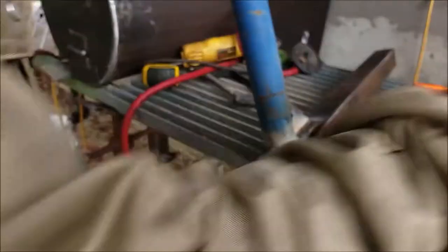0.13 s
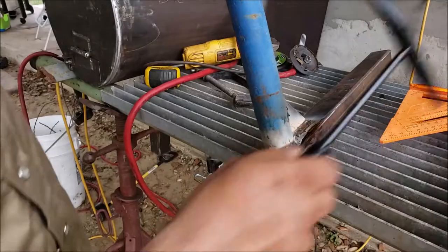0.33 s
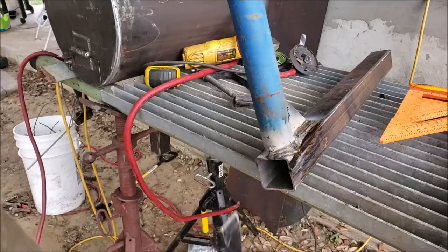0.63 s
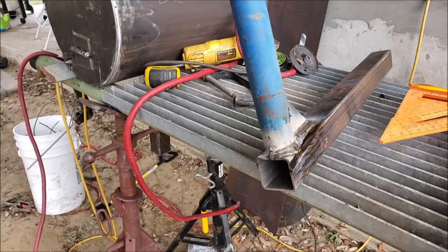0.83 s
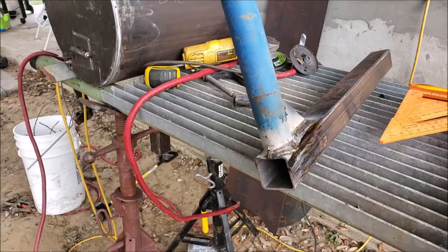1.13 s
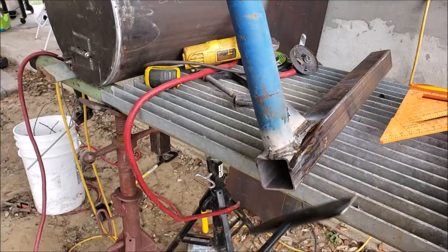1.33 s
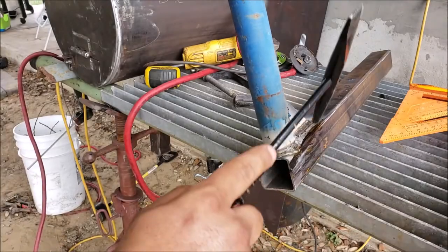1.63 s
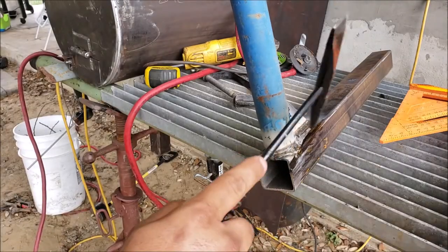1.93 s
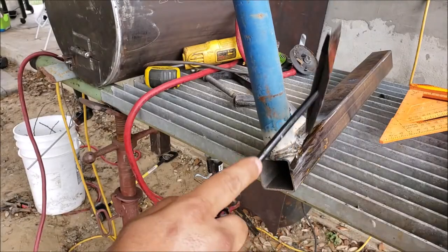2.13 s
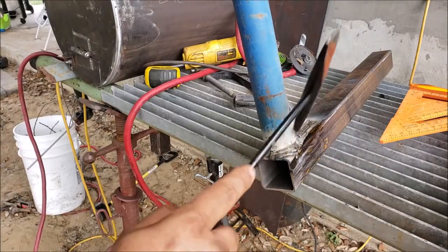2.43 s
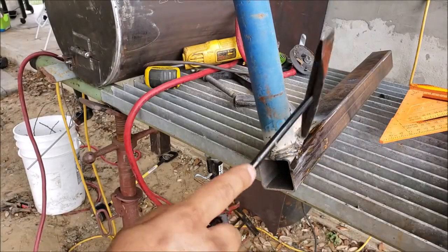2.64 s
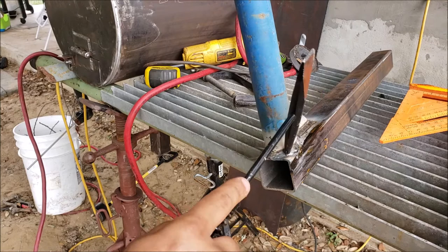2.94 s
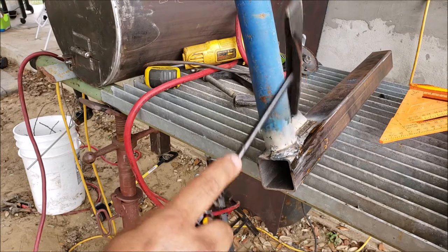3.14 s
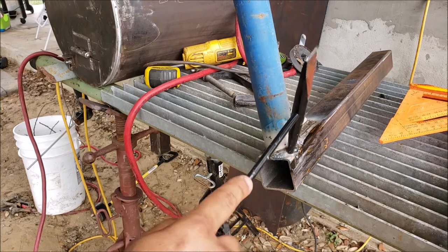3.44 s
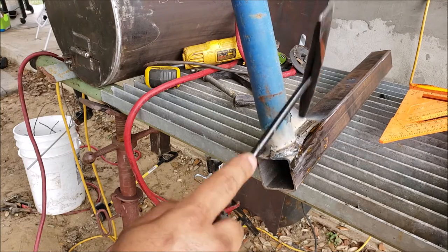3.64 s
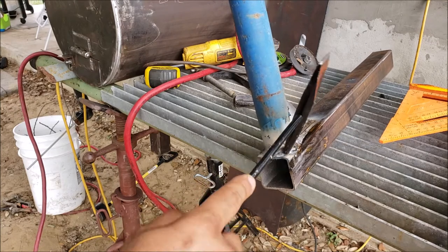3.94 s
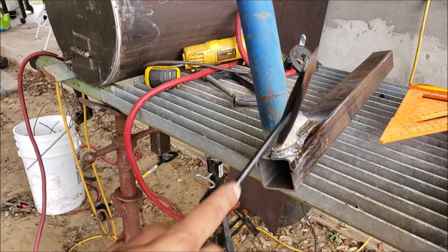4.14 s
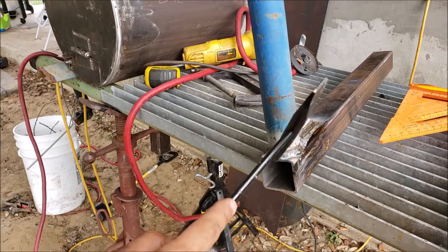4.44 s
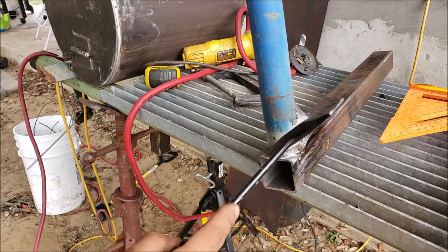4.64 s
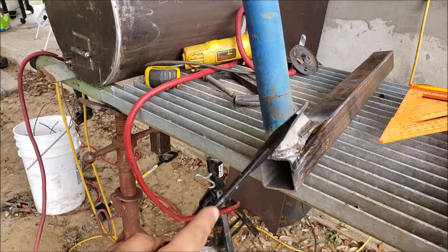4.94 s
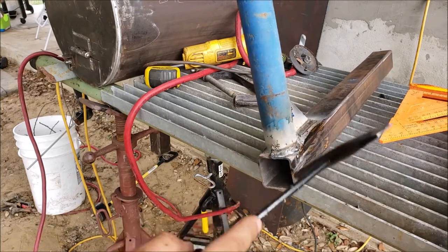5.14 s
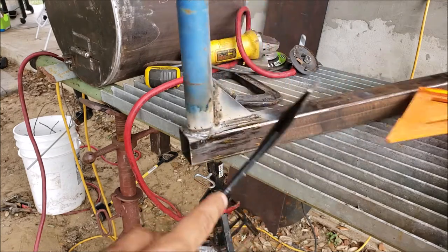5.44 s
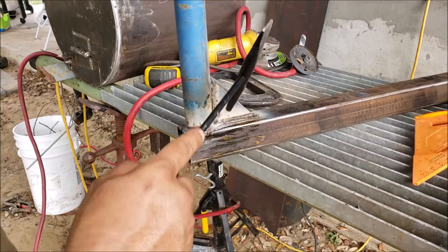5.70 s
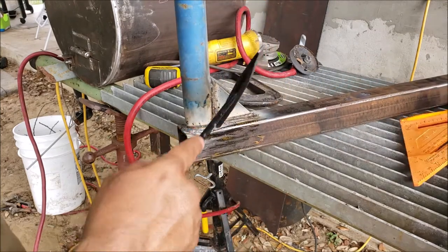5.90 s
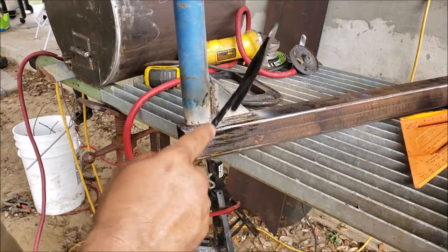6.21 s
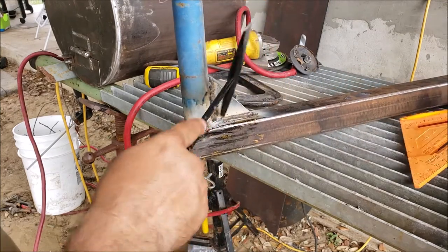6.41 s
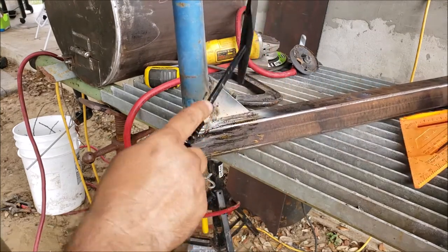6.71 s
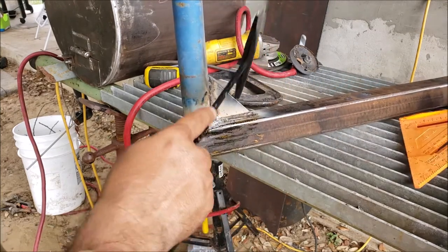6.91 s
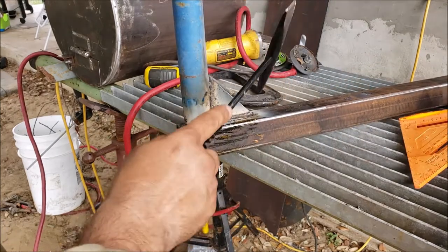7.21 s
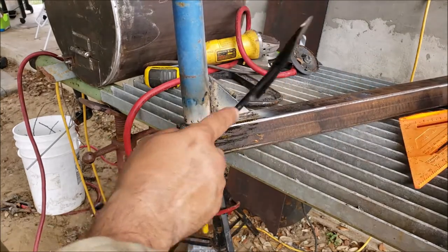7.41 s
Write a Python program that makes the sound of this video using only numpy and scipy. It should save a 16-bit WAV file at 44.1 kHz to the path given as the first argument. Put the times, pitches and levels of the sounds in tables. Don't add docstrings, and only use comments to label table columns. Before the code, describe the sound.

Outdoors, bright metallic hammer taps at about four per second, a scrape and rattling drop, then more taps over a low engine hum.

```python
import sys
import numpy as np
from scipy import signal
from scipy.io import wavfile
from scipy.ndimage import uniform_filter1d

SR = 44100
rng = np.random.default_rng(int(sys.argv[2]) if len(sys.argv) > 2 else 0)


def boost_factor(decibels):
    exponent = np.asarray(decibels, float) / 20
    return 10 ** exponent


def put_to_file(sound):
    columns = np.atleast_2d(sound).T
    safe = np.clip(columns, -1, 1)
    whole_steps = np.round(safe * 32767)
    wavfile.write(sys.argv[1], SR, whole_steps.astype(np.int16))


N = 333396

# start_s, ring_db (3-4 kHz), thud_db (750 Hz, over ring),
# ting_db (6 kHz, over ring), chatter_ms
FIRST_WELD_BLOWS = [(1.8098, -10.5, -7.5, 1.5, 4.4), (2.0567, -8.5, -7, -10, 6.7),
                    (2.2897, -6, -7, -9.5, 8.4), (2.5252, -12, -7, -11.5, 4.8),
                    (2.7554, -12.5, -5, -10, 10), (2.9863, -7.5, -8, -11.5, 9.1),
                    (3.2361, -8, -7.5, -12, 11.3), (3.4642, -14, -9.5, -8.5, 3),
                    (3.705, -12, -4.5, -11, 4.7), (3.9434, -9, -12, -15, 8.6),
                    (4.1761, -11.5, -14, -14.5, 5.3), (4.404, -9.5, -19.5, -10, 10.7),
                    (4.644, -5, -11, -14.5, 14.8), (4.8938, -12.5, -12, -25, 20)]
SECOND_WELD_BLOWS = [
    (5.8645, -12.5, -7, -9, 7.3),
    (6.1137, -11, -26.5, -2, 28.7),
    (6.3674, -11, -13.5, -10, 5.1),
    (6.6004, -12, -10, -10, 5.1),
    (6.838, -11.5, -9.5, -4.5, 9.4),
    (7.0767, -5, -19.5, -13.5, 22.8),
    (7.3143, -12.5, -17.5, -6, 18.4),
    (7.5524, -12, -25, -11, 11),
]
SLAG_GRAZES = [
    (4.1774, -21, -0.5, 1.5, 3.5),
    (4.3966, -11, -4, -22, 4.3),
    (4.8878, -14, -7, -7, 2.8),
    (4.9154, -19.5, -7, -8, 3.7),
]
# start_s, ring_db, clank_db (2 kHz, over ring), ting_db (6 kHz, over ring), chatter_ms
FRAME_LANDINGS = [
    (5.2766, -33.5, -12, -4, 4.0),
    (5.4419, -13, -18, -10, 11),
    (5.4565, -10, -5, -4, 32),
    (5.5604, -20.5, -8.5, -1, 2.5),
    (5.6173, -29, 4.5, -9.5, 5.5),
    (5.762, -31.5, -10, -15, 8.5),
]
# start_s, level_db, hold_s
FRAME_SKIDS = [
    (5.266, -28.5, 0.055),
    (5.322, -23, 0.027),
    (5.457, -26.5, 0.018),
    (5.57, -35, 0.036),
]

BLOW_COLOUR_HZ = [760, 1900, 3600, 6200, 11000]
# start_s, centre_hz, width_octaves, boost_db
FAVOURED_GROUPS = [(1.81, 2240, 0.096, 6), (3.46, 4330, 0.3, 6.5), (3.7, 3792, 0.03, 11.5),
                   (4.64, 2770, 0.032, 9), (5.46, 731, 0.11, 9), (5.86, 1780, 0.22, 5.5),
                   (6.11, 5700, 0.11, 5), (6.37, 4885, 0.016, 8), (6.84, 1530, 0.12, 2.5),
                   (7.08, 3678, 0.0073, 2.5), (3.94, 3150, 0.02, 1.5), (6.11, 3300, 0.11, -3),
                   (5.44, 9100, 0.51, 2.5), (2.06, 1530, 0.11, 7), (1.81, 770, 0.12, 4),
                   (2.53, 2070, 0.13, 4), (7.32, 5546, 0.016, -2), (5.62, 6500, .6, 6.5),
                   (7.08, 3231, 0.018, 6), (7.32, 4480, 0.068, 13.5)]
FIRST_WELD_HZ = [2050, 3150, 3792, 4402]
SECOND_WELD_HZ = [2125, 3678, 4402, 5555]

TUBE_HZ = [699, 770, 948, 1195, 1530, 2003, 2050, 2138, 2753, 2880, 3140, 3160, 3231, 3360, 3678, 3792,
           3900, 4104, 4270, 4402, 4561, 4885, 5240, 5476, 5546, 5646, 5818, 5960, 6056, 6538]
# level_db, fade_s (time to fall 60 dB)
FIRST_WELD_MODES = [(-17.5, 0.24), (0, 0.14), (-23, 0.5), (-18, 0.048), (-11, 0.21), (0.5, 0.085),
                    (-14.5, 0.35), (-14.5, 0.29), (-0.5, 0.079), (-23, 0.26), (-14, 0.45), (-13, 0.39),
                    (-18, 0.61), (-25, 0.16), (-5, .2), (-11, 0.15), (-18, 0.45), (-13.5, 0.12),
                    (-0.5, 0.15), (-5.5, 0.21), (-15, 0.28), (-12, 0.17), (-14.5, 0.21), (-41, .25),
                    (-22, 0.5), (-22, 0.58), (-27, 0.17), (-9.5, 0.076), (-12.5, 0.17), (-9, 0.083)]
SECOND_WELD_MODES = [(-1.5, 0.1), (-3.5, 0.21), (-28, 0.47), (-6.5, 0.16), (1.5, 0.11), (-19, 0.52),
                     (-0.5, 0.11), (-29.5, 0.58), (-37, 0.17), (-13, 0.14), (-16.5, 0.2), (-11, 0.42),
                     (-10, 0.24), (-14, 0.29), (-9.5, 0.16), (-10, .25), (-17, 0.38), (-15, 0.17),
                     (-3, 0.11), (-14, .18), (-13, 0.11), (-7.5, 0.17), (-11, 0.18), (-14, 0.092),
                     (-9, 0.24), (-15, 0.09), (-4.5, 0.22), (-17.5, 0.29), (-6, 0.32), (-8, 0.11)]
# pitch_hz, level_db, fade_s
SLAG_CRACK = [(1052, -0.5, 0.032), (1533, 2, 0.052), (2012, 6.5, 0.031), (2660, 9.5, 0.0072),
              (4560, 2, 0.029), (7180, 13.5, 0.0067), (11870, -2, 0.0075), (14950, -1.5, 0.0076)]
# pitch_hz, level_db (per Hz)
GRATING_TONE = [(180, -50), (300, -16), (596, -10), (766, 7.5), (1050, -16), (1550, -12.5), (2510, -13.5),
                (3750, -13.5), (4990, -13), (6740, -8.5), (8810, -26.5), (9740, -28), (13800, -30.5),
                (16400, -44)]
# pitch_hz, fade_s
GRATING_FADE = [(300, 0.18), (1000, 0.078), (3000, 0.26), (6000, 0.31), (9000, 0.17), (14000, 0.23)]
# pitch_hz, level_db (per Hz)
SCRAPE_TONE = [(150, -39), (260, -17), (387, 3), (493, -12.5), (567, -6), (1420, -9.5), (3740, -9.5),
               (11700, -32), (16300, -34)]
# pitch_hz, lead_radians
LEFT_LEADS = [(100, .05), (700, 0.48), (1500, 1.16), (3000, 1.47), (6000, 1.65), (15000, 0.78)]
# pitch_hz, more_db
LEFT_LOUDER = [(300, 9), (700, -6), (1500, -1), (3000, 1.5), (6000, -1), (10000, -7.5), (15000, -2.5)]

# time_s, firing_hz, loudness_db (after the volume control)
WELDER_ENGINE = [(0.0, 61.1, -30), (0.06, 61.86, -29.5), (1.37, 61, -29.5), (1.66, 61.1, -28),
                 (2.32, 60.72, -31), (4.46, 61.18, -31.5), (6.08, 60.48, -32.5), (6.13, 60.5, -31),
                 (6.17, 61.46, -35.5), (7.2, 60.6, -35.5), (7.56, 61, -38)]
# multiple (of half the firing rate), level_db
EXHAUST_TONES = [(1, -31), (2, 0), (3, -14), (4, -13), (5, -21), (6, -19), (7, -29), (8, -25), (9, -25),
                 (10, -30), (11, -33), (12, -33), (13, -37), (14, -37)]
# pitch_hz, level_db (per Hz)
YARD_TONE = [(30, -21), (62, -15), (105, -10), (180, -15), (270, -17), (457, -24), (858, -19.5),
             (1330, -28), (2400, -25), (4420, -33), (6440, -29.5), (8650, -44), (11400, -36.5),
             (15900, -44)]
# pitch_hz, likeness (1 = the same)
YARD_ALIKE = [(60, 0.93), (180, 0.68), (550, 0.36), (1650, -0.055), (4970, -0.047), (15000, -0.29)]
# time_s, pitch_hz, level_db
BIRD_CALL = [
    (.17, 4200, -75),
    (.23, 4250, -53),
    (.26, 3900, -58),
    (.3, 3350, -53),
    (.33, 3300, -78),
]

STEADY_HZ = 3000
SWING_DB = 5
FIRST_CLANK_DB, SECOND_CLANK_DB, LEAST_CLANK_DB = 3.5, 7.5, -8.5
LANDING_THUD_DB, THUD_PER_DB = 13, 2.4
FIRST_CLEAR_DB, FIRST_CLEAR_S = 2, 1
SECOND_CLEAR_DB, SECOND_CLEAR_S = 25, 1.8
FIZZ_DB, FIZZ_PER_TING = 9.5, .8
SKID_RISE_S, SKID_FADE_DB_PER_S = .012, 200


def hammer():
    early = with_clank(FIRST_WELD_BLOWS, FIRST_CLANK_DB)
    late = landings() + with_clank(SECOND_WELD_BLOWS, SECOND_CLANK_DB)
    early_spots = cleared(early, early[0][0], FIRST_WELD_HZ, FIRST_CLEAR_DB, FIRST_CLEAR_S)
    late_spots = cleared(late, SECOND_WELD_BLOWS[0][0], SECOND_WELD_HZ, SECOND_CLEAR_DB, SECOND_CLEAR_S)
    blows, spots, turn = early + late, early_spots + late_spots, len(early)
    forces = [contact(blow[-1]) for blow in blows]

    first_modes = np.column_stack([TUBE_HZ, FIRST_WELD_MODES])
    first_rings = rings(first_modes, .8, scatter_rad=0.6, scatter_db=5.03)
    first = strike(early, early_spots, forces[:turn], first_modes, first_rings,
                   level_db=-1.0, spread_db=2.0, steady_hz=STEADY_HZ)
    second_modes = np.column_stack([TUBE_HZ, SECOND_WELD_MODES])
    second_rings = rings(second_modes, 1.0, scatter_rad=0.12, scatter_db=3.2)
    second = strike(late, late_spots, forces[turn:], second_modes, second_rings,
                    level_db=-1.5, spread_db=-2.5, steady_hz=STEADY_HZ)

    bars = grating_modes(GRATING_TONE)
    bar_rings = rings(bars, 0.49, scatter_rad=0.53, scatter_db=7.2)
    clang = strike(blows, spots, forces, bars, bar_rings, level_db=-13.5, spread_db=3.5)
    scrapes = slag_grazes(spots, bars, bar_rings)
    return first + second + clang + slag_crack(blows, spots, forces) + scrapes


def slag_crack(blows, spots, forces):
    square = [(s, db - 14 * np.log10(ms / 8), *rest, ms) for s, db, *rest, ms in blows]
    taps = [force[:90] for force in forces]
    crack_rings = rings(SLAG_CRACK, .06, scatter_rad=0.31, scatter_db=0.8)
    return strike(square, spots, taps, SLAG_CRACK, crack_rings,
                  level_db=-3.5, spread_db=4.5, steady_hz=STEADY_HZ)


def slag_grazes(spots, bars, bar_rings):
    grazes = with_clank(SLAG_GRAZES, FIRST_CLANK_DB)
    forces = [contact(graze[-1]) for graze in grazes]
    return strike(grazes, spots, forces, bars, bar_rings, level_db=-16.5, spread_db=1.0)


def landings():
    return [(s, db, LANDING_THUD_DB + THUD_PER_DB * db, *rest) for s, db, *rest in FRAME_LANDINGS]


def with_clank(blows, clank_db):
    return [(s, db, thud, max(thud + clank_db, LEAST_CLANK_DB), ting, ms)
            for s, db, thud, ting, ms in blows]


def cleared(blows, start_s, rings_hz, clear_db, clear_s):
    spots = []
    for s, *rest in blows:
        bare = 1 - np.exp(-max(s - start_s, 0) / clear_s)
        spots.append((s, *rings_hz, clear_db * bare))
    return spots


def contact(ms, bounces_per_s=1500, bounce_db=-12):
    chance, size = rng.random((2, SR // 10))
    direction = np.sign(np.sin(1e4 * size))
    force = boost_factor(bounce_db) * np.log(size) * (chance < bounces_per_s / SR) * direction
    t_ms = 1000 * np.arange(SR // 10) / SR
    force *= np.sqrt(ms / 10) * np.exp(-(t_ms / max(ms, .5)) ** 2)
    force[0] = 1
    return force


def strike(blows, spots, forces, modes, ring, level_db, spread_db, steady_hz=0):
    out, hz = np.zeros((2, N + 2 * SR)), np.array(modes)[:, 0]
    luck = rng.standard_normal((len(blows), 2, len(modes)))
    for blow, spot, force, (uneven, sign) in zip(blows, spots, forces, luck):
        hits = np.flatnonzero(np.abs(force) > 1e-3)
        push = np.abs(np.exp(-2j * np.pi * np.outer(hz, hits) / SR) @ force[hits])
        direction = np.where(hz < steady_hz, 1, np.sign(sign))
        strength_db = colour_db(blow, spot, hz) + level_db + spread_db * uneven
        strength = direction * boost_factor(strength_db) / (push + 0.54)
        swing = boost_factor(SWING_DB * (np.minimum(np.abs(sign), 1.6) - 0.6057) * [[1], [-1]])
        stirred = np.einsum('cm,cmt->ct', strength * swing, ring, optimize=True)
        sound = signal.fftconvolve(stirred, force[None], axes=1)
        at = round(blow[0] * SR)
        out[:, at:at + sound.shape[1]] += sound
    return out[:, :N]


def colour_db(blow, spot, hz):
    s, db, thud, clank, ting, ms = blow
    group_db = sum(more_db * np.exp(-(np.log2(hz / centre) / width) ** 2)
                   for at, centre, width, more_db in FAVOURED_GROUPS if abs(at - s) < .01)
    _, *favoured_hz, boost_db = spot
    near = sum(np.exp(-(np.log(hz / centre) / .012) ** 2) for centre in favoured_hz)
    colour = (thud, clank, 0, ting, FIZZ_DB + FIZZ_PER_TING * ting)
    broad_db = at_hz(list(zip(BLOW_COLOUR_HZ, colour)), hz)
    return db + broad_db + boost_db * np.minimum(near, 1) + group_db


def rings(modes, seconds, scatter_rad, scatter_db, rise_ms=0.44):
    hz, db, t60 = np.transpose(modes)[:, :, None]
    t = np.arange(round(seconds * SR)) / SR
    ports = rng.standard_normal((2, len(modes), 1))
    lead = at_hz(LEFT_LEADS, hz) + scatter_rad * ports[0] * np.minimum(hz / 2500, 1)
    more_db = at_hz(LEFT_LOUDER, hz) + scatter_db * ports[1]
    decay = boost_factor(db - 60 * t / np.maximum(t60, .005)) * np.tanh(1000 * t / rise_ms) ** 2
    return np.array([boost_factor(way * more_db / 2) * decay * np.sin(2 * np.pi * hz * t + way * lead / 2)
                     for way in (1, -1)])


def grating_modes(tone, count=520):
    hz = np.linspace(300, 16500, count) + 10 * rng.standard_normal(count)
    uneven = np.clip(rng.standard_normal((2, count)), -2, 1.5) * [[2.5], [.15]]
    return np.transpose([hz, at_hz(tone, hz) + uneven[0], at_hz(GRATING_FADE, hz) * np.exp(uneven[1])])


def drag(grains_per_s=2000, drag_db=-4.0):
    push = skid_push() * boost_factor(2.1 * drift(51))
    sizes = boost_factor(2.9 * np.minimum(rng.exponential(1, N), 4)) * rng.choice([-1, 1], N)
    clicks = rms_one(sizes * (rng.random(N) < grains_per_s / SR))
    bars = grating_modes(SCRAPE_TONE, count=300) * [1, 1, .35]
    body = rng.choice([-1, 1], len(bars)) @ rings(bars, 0.11, scatter_rad=0.32, scatter_db=2.4)
    body /= np.sqrt(np.sum(body ** 2) / 2)
    return boost_factor(drag_db) * signal.oaconvolve(body, (push * clicks)[None], axes=1)[:, :N]


def skid_push():
    s, db, hold = np.transpose(FRAME_SKIDS)[:, :, None]
    since = np.arange(N) / SR - s
    fade_db = SKID_FADE_DB_PER_S * np.maximum(since - hold, 0)
    return np.sum(np.clip(since / SKID_RISE_S, 0, 1) * boost_factor(db - fade_db), axis=0)


def engine(firing_hz):
    turn = np.pi * np.cumsum(firing_hz) / SR
    lag = np.array([[.026], [-.026]])
    smear = .12
    sound = 0
    for k, db in EXHAUST_TONES:
        level = np.sqrt(2) * boost_factor(db + (0.27 + 0.1 * k) * drift(4.9))
        sound = sound + level * np.cos(k * (turn + lag) - smear * k * k)
    return sound


def yard():
    together = drift(1.0)
    wash = 0
    for hz, band in noise_bands(YARD_ALIKE):
        wash = wash + band * boost_factor(at_hz(YARD_TONE, hz) + 0.6 * together + 1.1 * drift(30))
    return rms_one(wash)


def bird():
    hz, db = in_time(BIRD_CALL)
    husky_hz = hz * (1 + 0.0119 * drift(65))
    return boost_factor(db + 9.0 * drift(60)) * np.sin(2 * np.pi * np.cumsum(husky_hz) / SR)


def noise_bands(likeness):
    edges = 25 * 2 ** np.arange(0, 9.5, 1 / 3)
    white = rng.standard_normal((2, 2, N))
    for k, (low, high) in enumerate(zip(edges, edges[1:])):
        band = signal.butter(2, [low, high], "band", fs=SR, output="sos")
        mid, side = signal.sosfilt(band, white[k % 2])
        centre = np.sqrt(low * high)
        alike = np.clip(at_hz(likeness, centre), -1, 1)
        yield centre, np.sqrt(1 + alike) * mid + np.sqrt(1 - alike) * side * [[1], [-1]]


def drift(rate_hz):
    r = np.exp(-80 * np.pi * rate_hz / SR)
    slow = signal.lfilter([1], [1, -2 * r, r * r], rng.standard_normal(N // 40 + 2002))[2000:]
    return np.interp(np.arange(N) / 40, np.arange(len(slow)), rms_one(slow))


def rms_one(x):
    return x / np.sqrt(np.mean(x ** 2) + 1e-20)


def in_time(rows):
    s, *columns = np.transpose(rows)
    return [np.interp(np.arange(N) / SR, s, column) for column in columns]


def at_hz(points, hz):
    points = np.array(points)
    return np.interp(np.log(hz), np.log(points[:, 0]), points[:, 1])


def scene():
    firing_hz, loudness_db = in_time(WELDER_ENGINE)
    yard_rel_db = -11
    behind = boost_factor(loudness_db) * (engine(firing_hz) + boost_factor(yard_rel_db) * yard())
    return behind + hammer() + drag() + bird()


def top_cut(x):
    return signal.sosfilt(signal.butter(12, 16510, fs=SR, output="sos"), x)


def record(dry):
    over_db = np.maximum(20 * np.log10(np.abs(dry).max(axis=0) + 1e-9) + 1.0, 0)
    fall_db = 250 * np.arange(N) / SR
    held_db = np.maximum.accumulate(over_db + fall_db) - fall_db
    mix = np.clip(dry * boost_factor(-.8 * uniform_filter1d(held_db, size=45)), -.99, .99)
    mix = signal.sosfilt(signal.cheby2(12, 60, 16800, fs=SR, output="sos"), mix)
    return top_cut(mix)


dry = scene()
out = record(dry)
put_to_file(out)
```